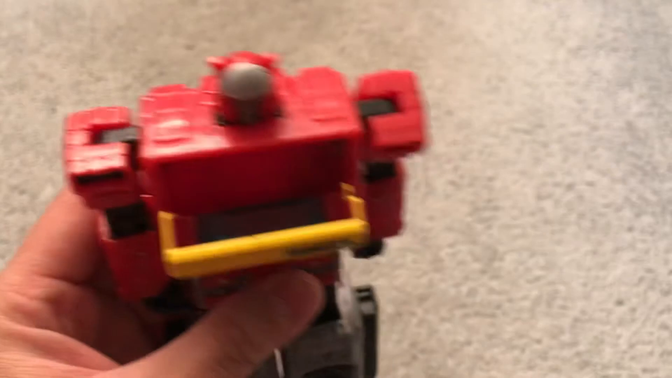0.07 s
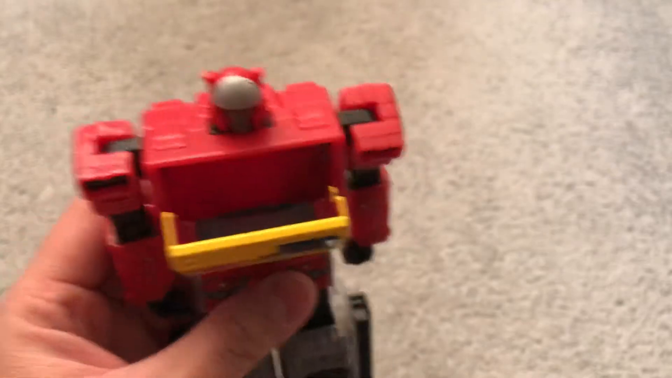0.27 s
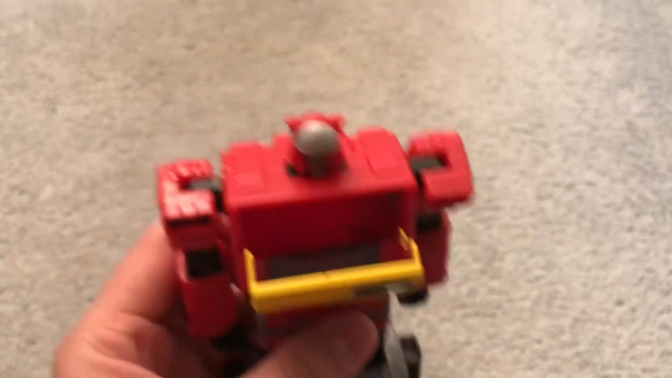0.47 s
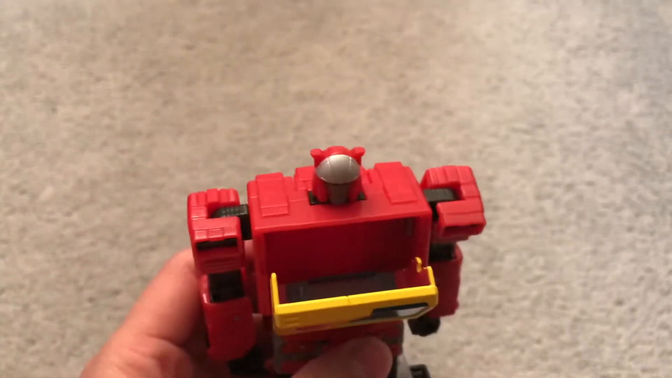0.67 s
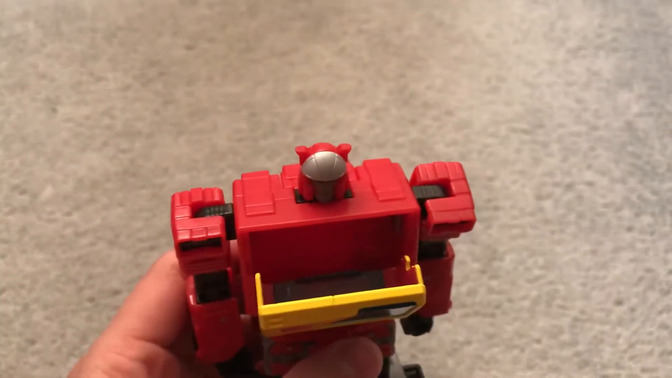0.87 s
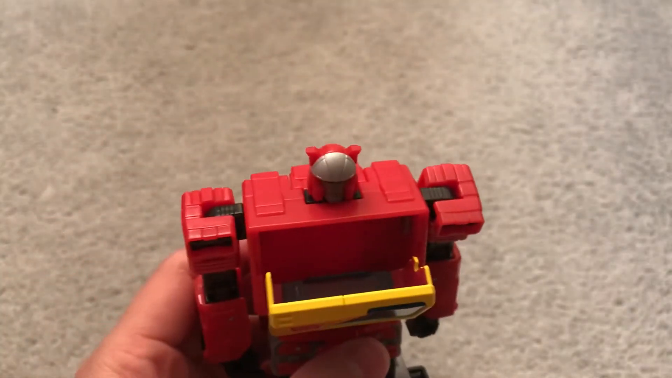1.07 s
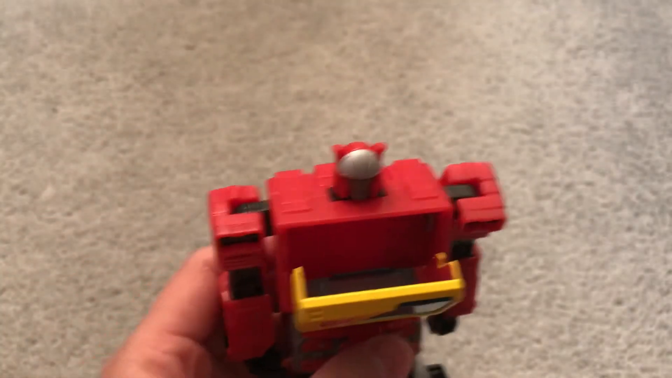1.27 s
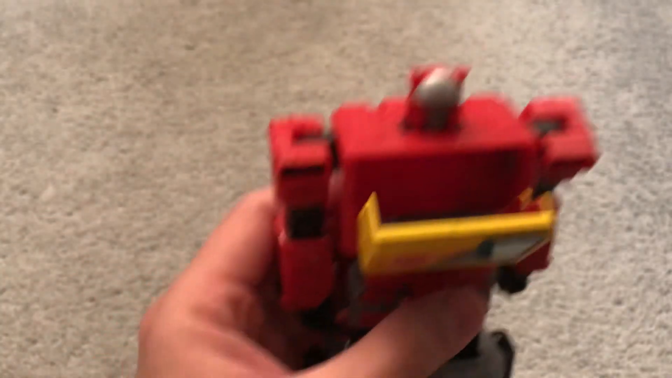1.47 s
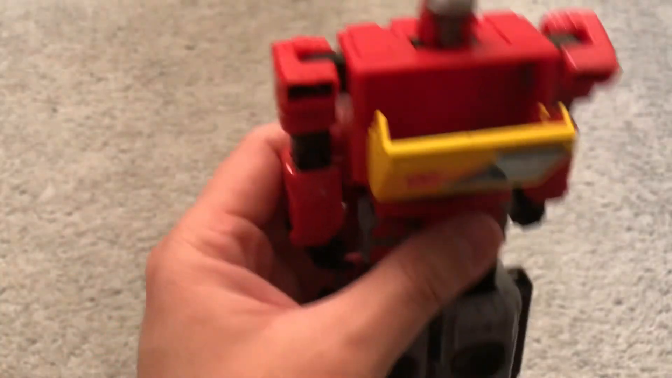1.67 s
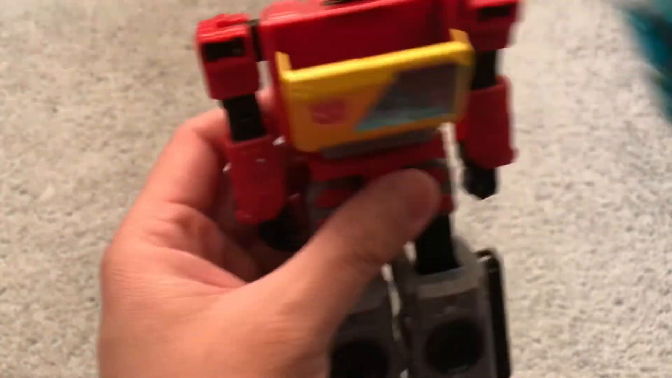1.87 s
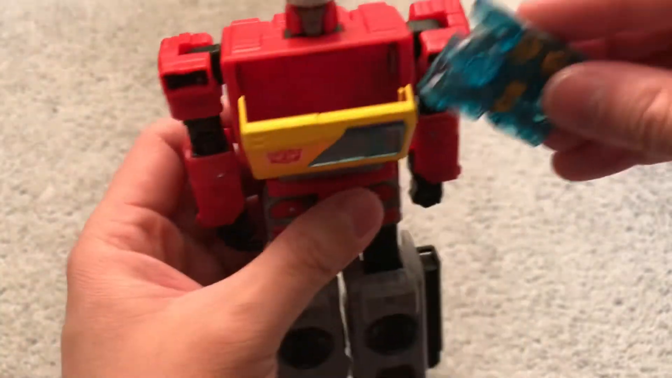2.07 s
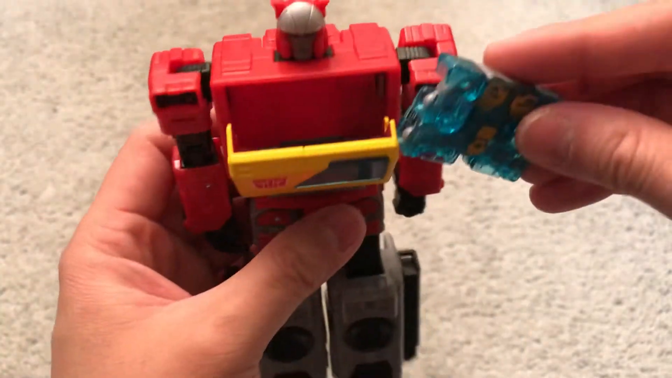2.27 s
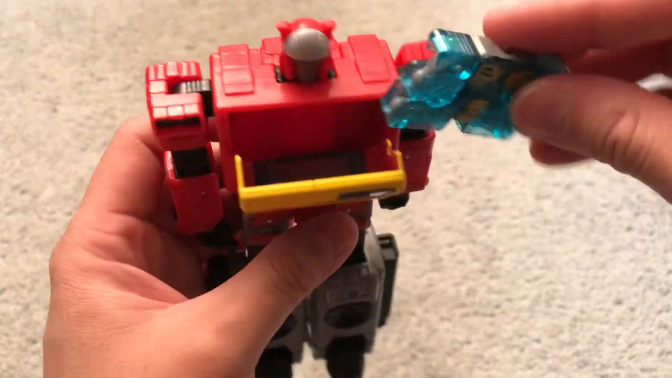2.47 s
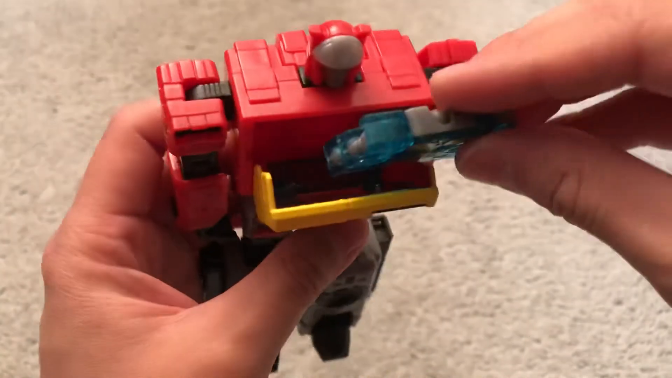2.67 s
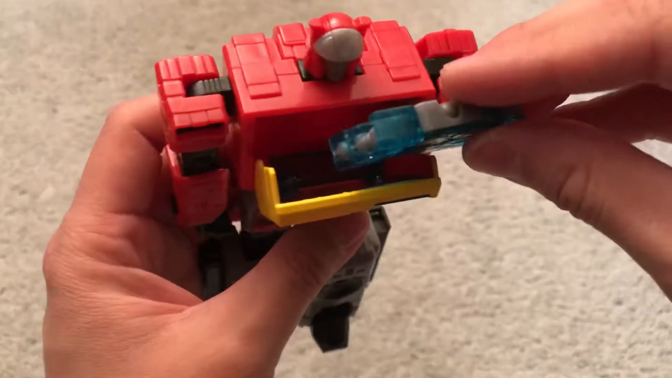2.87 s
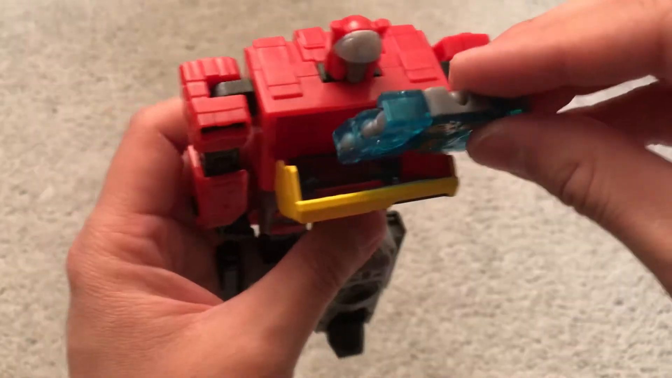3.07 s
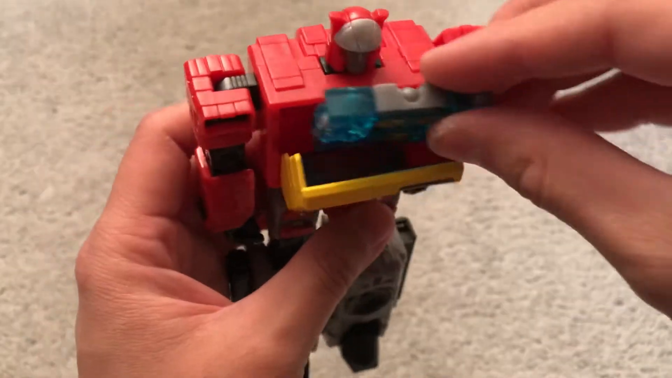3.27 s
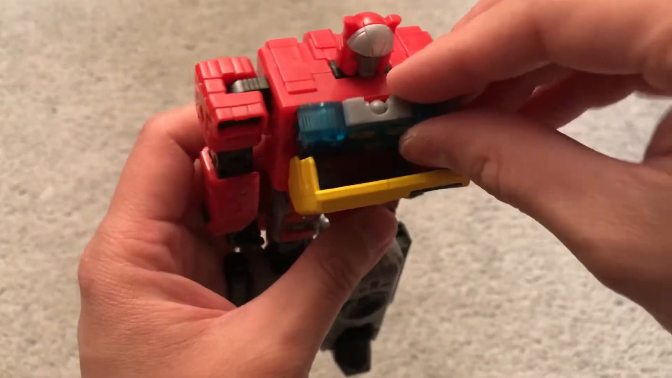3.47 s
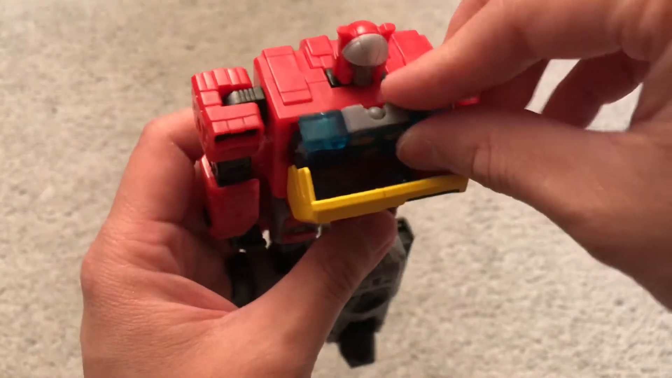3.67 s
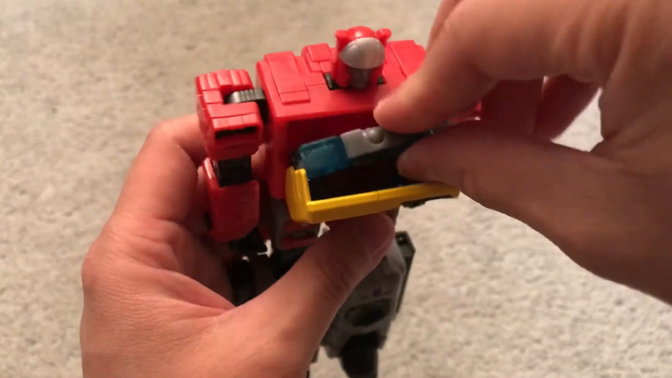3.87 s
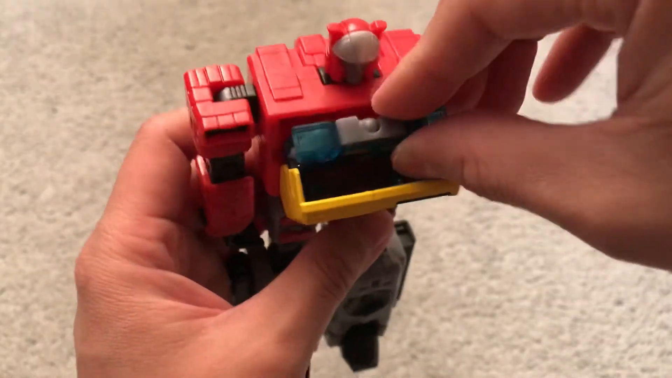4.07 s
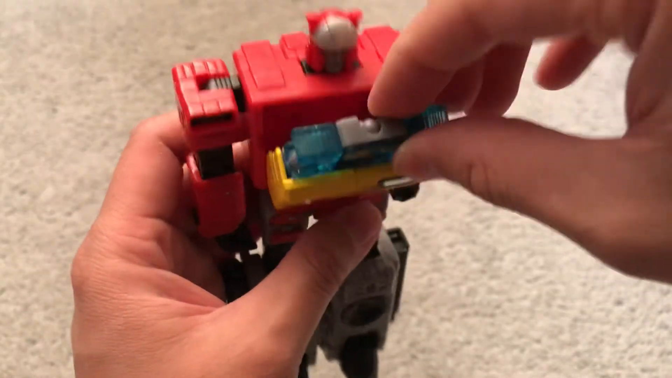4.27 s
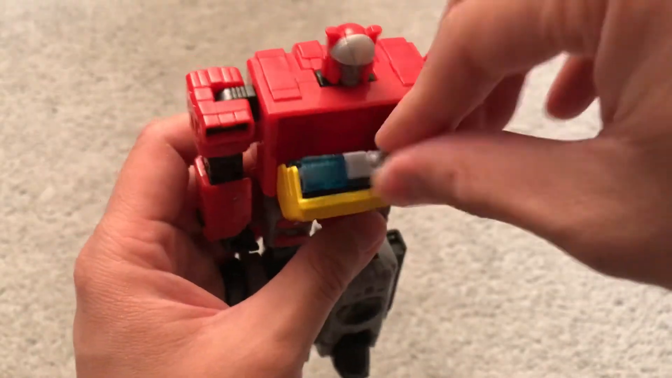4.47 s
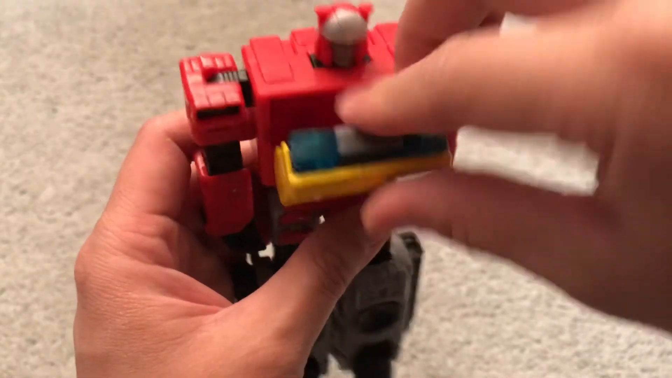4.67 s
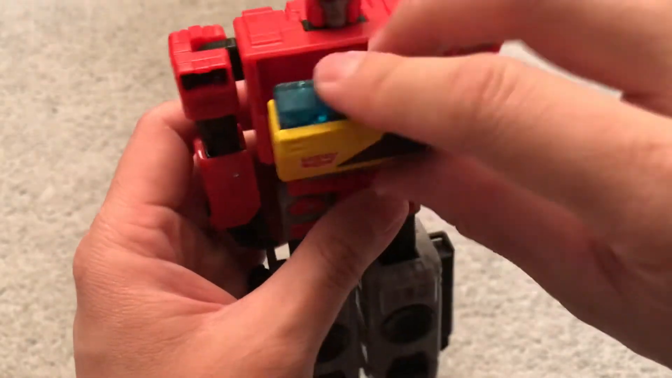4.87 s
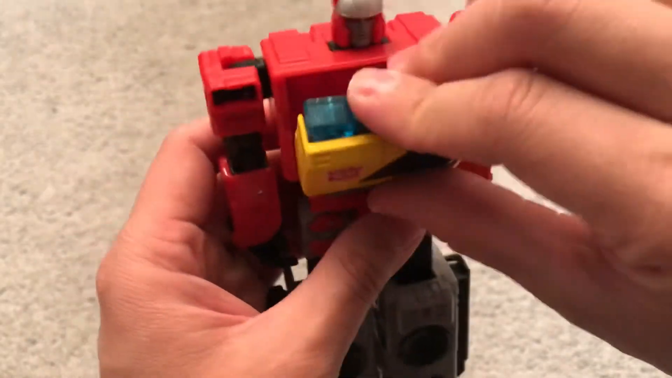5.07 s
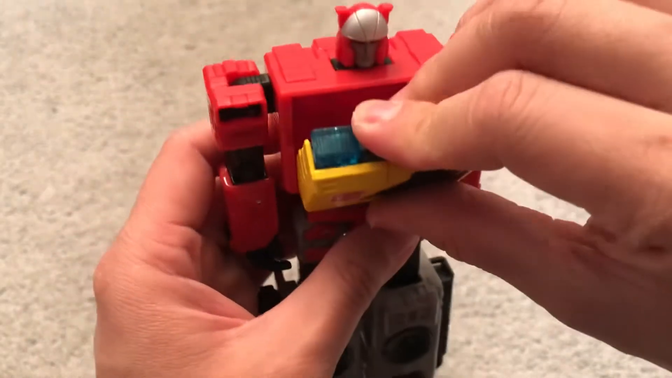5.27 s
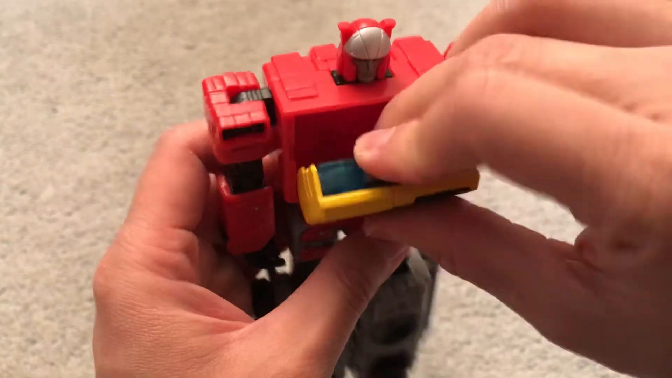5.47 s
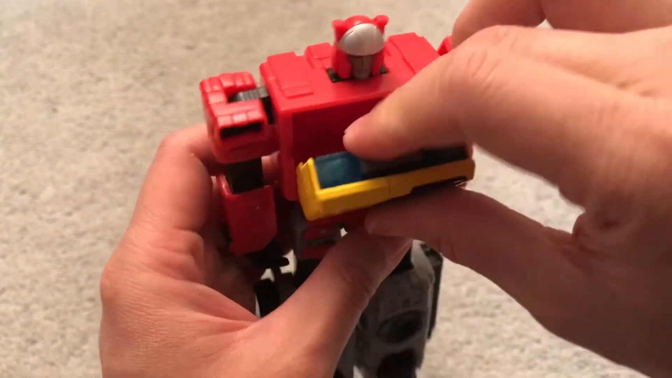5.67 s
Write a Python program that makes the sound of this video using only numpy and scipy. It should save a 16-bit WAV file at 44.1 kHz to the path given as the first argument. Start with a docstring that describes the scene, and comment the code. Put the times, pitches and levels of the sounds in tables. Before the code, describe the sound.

A hollow plastic toy is handled close to the microphone in a quiet carpeted room, over faint steady mains hum, low rumble and soft hiss. After half a second of quiet, light ticks gather from about 0.6 to 0.9 s, with one sharp bright click at 0.8 and a dull, lumpy palm rub lasting to 1.1. A lone click comes at 1.3, then near silence. Small ticks at 2.2 to 2.4 lead to a firm snap at 2.6. From 3.0 the clicks thicken: hard clacks around 3.05 and 3.35 to 3.6, lighter ticks and short scrapes to 4.0, then a busy rattle at 4.1 to 4.3. A strong double snap strikes at 4.45. Faint slides and sparse taps follow, with a clearer click at 5.33. By far the loudest latch snaps at 5.43, with a quickly fading plastic scrape and short, dry room tail.

```python
"""Folding a plastic toy

Hands fold a hollow plastic toy close to a microphone in a quiet carpeted room and push a part into its tray.
Hard parts click, snap and slide: short bursts of noise force make the toy's shell ring at many pitches.
A palm rubs the body early on, as dull, lumpy noise. Sparse echoes give the toy a short room tail.
Under it all are a mains hum (a wavering sine), a low rumble of the building and microphone hiss (shaped noise)."""
import sys
import numpy as np
from scipy import signal
from scipy.fft import rfft, irfft, next_fast_len
from scipy.io import wavfile
from scipy.ndimage import uniform_filter1d

SR = 44100
rng = np.random.default_rng(int(sys.argv[2]) if len(sys.argv) > 2 else 0)


def voltage_ratio(level):
    """Linear amplitude factor for a level in decibels (scalar or array-like)."""
    return 10 ** (np.asarray(level, float) / 20)


def wav_record(signal):
    """Record a signal, one row per channel, as 16-bit PCM in the file named by sys.argv[1]."""
    frames = np.transpose(np.atleast_2d(signal))
    bounded = np.clip(frames, -1, 1)
    # unit amplitude maps onto the largest positive 16-bit level
    quanta = np.round(bounded * 32767).astype(np.int16)
    wavfile.write(sys.argv[1], SR, quanta)


N = 252252  # length in samples


def read(points, hz):
    """Reads a table of (Hz, value) points between its rows, on a log-frequency axis."""
    f, value = np.transpose(points)
    return np.interp(np.log(hz + 1), np.log(f + 1), value)


def evened(x):
    """Scales a signal to an rms of 1."""
    return x / np.sqrt(np.mean(x ** 2) + 1e-20)


def add(mix, s, sound):
    """Mixes a sound in at second s."""
    part = mix[round(s * SR):][:len(sound)]
    part += sound[:len(part)]


def coloured(points):
    """Steady noise: white noise whose frequencies are weighted by a table of (Hz, dB)."""
    hz = np.fft.rfftfreq(N, 1 / SR)
    spectrum = rfft(rng.standard_normal(N)) * voltage_ratio(read(points, hz))
    return evened(irfft(spectrum, N))


# Spectrum of the rumble and hiss together.
# Each row: frequency in Hz, relative level in dB per Hz.
RUMBLE_AND_HISS = [(20, -23), (34, -14), (46, 4.5), (62, -3), (85, -13.5), (140, -12.5), (175, -20),
                   (320, -22.5), (900, -31.5), (2500, -35.5), (4700, -39), (9300, -42.5), (10500, -45),
                   (11600, -38.5), (13000, -37.5), (15600, -45), (16100, -72)]


def background():
    """Noise for the rumble and hiss, with a steady mains hum whose level wavers slightly."""
    hum_hz, hum_db, floor_db = 119.8, -64, -59.5  # levels are rms
    t = np.arange(N) / SR
    slow = uniform_filter1d(rng.standard_normal(N), size=6000)
    waver = evened(uniform_filter1d(slow, size=6000))
    hum = np.sqrt(2) * voltage_ratio(hum_db + 0.65 * waver) * np.sin(2 * np.pi * hum_hz * t)
    return hum + voltage_ratio(floor_db) * coloured(RUMBLE_AND_HISS)


# The ways the plastic shell can ring, called its modes, before each contact shifts them a little.
# Each row: pitch in Hz, width of the resonance in Hz (wider dies sooner), relative level in dB.
SHELL_MODES = [(140, 92, -9), (356.4, 430, -11), (526, 830, -9.5), (796, 1300, -6.5), (1134, 350, 1),
               (1674, 300, -12), (2150, 890, -6), (2500, 266, 2.5), (3000, 540, 0.5), (3600, 1070, -5.5),
               (4163, 1160, -4), (4740, 890, -12), (5720, 610, -3.5), (6740, 960, -6.5), (8260, 1120, -4.5),
               (9060, 1400, -6), (12200, 350, -3.5), (14140, 1500, -12.5), (14800, 760, -6)]


def shell(force, ring_hz, treble_db, thud_db, chance, ring_db=5.0):
    """The force drives every mode; where the part is touched decides which one rings most."""
    size = next_fast_len(len(force) + 1500)
    hz = np.fft.rfftfreq(size, 1 / SR)[:, None]
    f, width, db = np.transpose(SHELL_MODES + [(ring_hz, 340, ring_db)])
    db = db + treble_db * (f > 5200) * (f != ring_hz) + thud_db * (f < 1500)
    # Modes near the touched one share its motion
    db = db - 3.3 * abs(np.log2(f / ring_hz)) * (f > 1500)
    # Chance varies every level, and every pitch but the touched one
    level_chance, pitch_chance = chance[:len(f)], chance[len(f):2 * len(f)]
    db = db + 1.5 * level_chance
    f = f * (1 + 0.015 * pitch_chance * (f != ring_hz))
    # Neighbours in opposite phase leave no deep gaps between them
    sign = (-1.) ** np.argsort(np.argsort(f))
    modes = sign * voltage_ratio(db) * width * hz * 1j / (f ** 2 - hz ** 2 + 1j * width * hz)
    # Small panels radiate no bass
    no_bass = (1j * hz / (1j * hz + 1800)) ** 2
    response = np.where(f > 1500, modes * no_bass, modes).sum(1)
    return irfft(rfft(force, size) * response, size)[:size - 400]


# Every contact between hard parts of the toy.
# Each row: time in seconds, peak level in dB (a sine as strong as its loudest millisecond),
# pitch that rings most in Hz, hardness as treble in dB, thud (change below 1500 Hz) in dB.
CONTACTS = [(0.531, -59.5, 7600, 19, -30), (0.6457, -49, 5770, -10, -13), (0.6713, -46, 6500, -5, -1),
            (0.6824, -37.5, 5770, -6, -28), (0.709, -45.5, 2750, -0.5, -24), (0.7454, -56, 3280, 1, -18),
            (0.767, -53, 2840, -2, -28), (0.7955, -41, 7060, -7, -5), (0.8052, -25, 3600, 11, -10),
            (0.8389, -40.5, 4100, 4, -3), (0.862, -52, 6250, -10, -26), (1.002, -46, 3600, -2, -9),
            (1.027, -56.5, 3200, -10, -28), (1.2898, -39, 2990, -2, -2), (1.723, -54.5, 3900, 1.5, -32),
            (2.191, -37.5, 2380, -8.5, -35), (2.3333, -43.5, 2980, -3, -24), (2.3404, -46, 2160, -1, -32),
            (2.3487, -33.5, 2680, -7.5, -33), (2.365, -36.5, 2150, -6, -24), (2.432, -53, 8850, 16, -24),
            (2.6014, -22, 2970, -9.5, -15.5), (2.6181, -32, 5430, -24, -11.5), (2.636, -42, 2410, -25, -7),
            (2.6465, -42, 2520, -26, -17), (2.7607, -49.5, 3000, -25, -18), (2.778, -54, 2970, -22, -22),
            (2.8166, -53, 3160, -20, -37), (2.9791, -46.5, 1890, -5, -24), (3.0449, -25.5, 2670, -40, -18),
            (3.0584, -40, 2500, -26, -17), (3.0736, -29, 5610, 2, -15), (3.0815, -32, 2500, -13, -15.5),
            (3.2686, -49, 2200, -5, -8), (3.338, -27.5, 7060, 1, -5.5), (3.3693, -22.5, 2700, -12, -35),
            (3.3862, -36.5, 3070, -13, -16), (3.408, -28, 5900, -5.5, -17), (3.4517, -23, 5745, -17, -36),
            (3.457, -31, 2040, -20, -23), (3.4876, -35.5, 2500, -12, -24), (3.5436, -36.5, 4870, -7, -25),
            (3.5501, -28, 4640, -2, -30), (3.5951, -33, 4700, -5.5, -24), (3.6077, -49, 4100, -5, -21),
            (3.7648, -51, 2120, -18, -29), (3.7762, -39.5, 2980, -3.5, -15), (3.8046, -34, 3770, 3.5, -29),
            (3.8156, -51, 2700, -9, -10), (3.8309, -46, 4370, -3, -16), (3.8766, -51.5, 2620, -25, -29),
            (3.9077, -52, 3060, -19, -26), (3.9464, -46, 4480, -19, -31), (3.9726, -52, 2100, -14, -26),
            (4.0289, -41.5, 2640, -10, -14), (4.084, -38.5, 4430, -17, -29), (4.0962, -27, 2920, -8.5, -38),
            (4.139, -36.5, 2800, -11, -34), (4.1645, -45, 3050, -8.5, -31), (4.1761, -29, 2480, -8.5, -33),
            (4.2009, -24, 2600, -6, -29), (4.2191, -29.5, 2730, -7.5, -19), (4.229, -44, 3000, -12, -17),
            (4.2663, -25, 2820, 1.5, -43), (4.2895, -41.5, 2690, -5.5, -28), (4.422, -43.5, 5730, -12, -26),
            (4.4462, -23.5, 2920, -14.5, -11), (4.4502, -13.5, 4300, 0.5, -14.5), (4.5123, -45, 4200, 3, 0),
            (4.5226, -44.5, 3970, -1, 1), (4.608, -53, 2910, 3, -2), (4.6986, -39, 4070, -18, -36),
            (4.7666, -51, 5650, 1.5, -24), (5.0797, -56, 3200, -17, -29), (5.1798, -58, 4000, -11.5, -26),
            (5.2064, -42.5, 6030, -5.5, -33), (5.2567, -39, 4260, -13, -7.5), (5.267, -45, 4330, -8.5, -32),
            (5.3243, -53, 4260, -4.5, -24), (5.3328, -30, 4530, -4, -21), (5.359, -47, 2450, -14, -17),
            (5.3783, -36, 2500, -12, -26), (5.408, -41.5, 4020, 4, -10), (5.4253, -42, 3400, 0.5, -13),
            (5.4298, -5.5, 4190, 0, -17)]


def clicks():
    """A sharp blow, chatter while the parts touch, then a weak, duller rattle dying away."""
    tap_s, latch_s = 0.002, 0.008  # time in touch of a light tap and of a forced latch
    loose_hz = 2750  # the loose tray that rattles after every contact
    out, t = np.zeros(N), np.arange(3000) / SR
    chances = rng.standard_normal((len(CONTACTS), 40))
    grits = rng.standard_normal((len(CONTACTS), len(t), 2))
    for (s, db, hz, treble_db, thud_db), chance, grit in zip(CONTACTS, chances, grits):
        # Light taps (near 1) bounce off at once; a forced latch (near 0) grinds on to its end
        light = 1 / (1 + voltage_ratio(db + 15.0) ** 2)
        part = t / (latch_s + (tap_s - latch_s) * np.sqrt(light))
        rise = np.minimum(t / 0.00031, 1)
        release = 1 + (part / (0.74 + 0.87 * light)) ** 5
        chatter = rise * voltage_ratio(-9.0 * light * part) / release * grit[:, 0]
        blow = voltage_ratio(14.5) * light * (t == 0)  # taps begin with one clean impact
        # A latch shakes the whole shell more evenly, so its main pitch stands out less
        ring_db = 6.0 - 1.5 * (1 - light)
        contact = shell(blow + chatter, hz, treble_db, thud_db, chance, ring_db)
        fading = voltage_ratio(-13 - 60 * t / 0.071) * np.minimum(t / 0.0029, 1)
        rattle_force = fading * uniform_filter1d(grit[:, 1], size=2)
        rattle_treble_db, rattle_thud_db = min(treble_db, 0) + 1.5, max(thud_db + 4.5, -16)
        rattle = shell(rattle_force, loose_hz, rattle_treble_db, rattle_thud_db, chance, 2.8)
        sound = contact + rattle
        loudest = np.sqrt(2 * uniform_filter1d(sound ** 2, size=44).max())
        add(out, s - 0.0002, voltage_ratio(db) * sound / loudest)
    return out


def grip():
    """Palm shifting on the toy: skin drags on the hollow body, a dull, low, lumpy rub."""
    start_s, end_s, fade_s = 0.616, 1.125, 0.096
    level_db, lumps_db = -67, 1.5
    t = np.arange(N) / SR
    held = np.clip(np.minimum(t - start_s, end_s - t) / fade_s, 0, 1)
    lumps = evened(uniform_filter1d(rng.standard_normal(N), size=1500))
    # Pairs of frequency in Hz and relative level in dB
    rub = coloured([(150, -24.0), (330, 1.5), (440, -12), (650, -15.5), (1300, -14), (3000, -29.5)])
    return held * voltage_ratio(level_db + lumps_db * lumps) * rub


# Slides and rattles of plastic on plastic.
# Each row: start in seconds, end in seconds, rms level in dB, pitch that rings most in Hz,
# change of the force from start to end in dB.
STROKES = [(0.68, 0.727, -60, 5970, -31), (0.796, 0.925, -53.5, 3600, -37), (0.996, 1.057, -72, 3600, -18),
           (2.269, 2.33, -70, 3670, 3), (2.327, 2.374, -57.5, 2940, 20), (2.76, 2.853, -82, 2920, 7),
           (2.888, 2.94, -71, 2800, -13), (2.937, 2.992, -67.5, 2300, 22), (3.055, 3.067, -67, 2700, -3),
           (3.086, 3.166, -79, 2680, 3), (3.643, 3.742, -65.5, 2820, -7), (3.751, 3.824, -63, 2020, -2),
           (3.911, 3.928, -63.5, 2810, 2), (3.93, 3.993, -74, 2500, 6), (4.01, 4.085, -69, 2500, 5),
           (4.105, 4.152, -54.5, 2820, -3.5), (4.156, 4.189, -56.5, 2920, 5.5),
           (4.2, 4.237, -62.5, 2800, 1.5), (4.261, 4.3, -58.5, 2660, -6.5),
           (4.422, 4.462, -50.5, 3000, 6.5), (4.45, 4.555, -64.5, 2500, -8.5),
           (4.601, 4.683, -66.5, 3000, -9), (4.678, 4.711, -58, 4070, 1.5), (4.744, 4.793, -70, 4100, -4),
           (4.839, 4.87, -69, 3050, -9), (4.854, 4.875, -61, 5420, 3), (4.908, 5.049, -66.5, 4080, 9.5),
           (5.413, 5.435, -52.5, 2840, 14.5), (5.429, 5.557, -39.5, 4070, -45)]


def slides():
    """Dense tiny slips in uneven clumps under each stroke, with a few sharper catches."""
    catches_per_s, catch_db = 65, 15  # now and then an edge catches and ticks
    firm_db, dulling = -57.5, 0.45  # softer slides lose this much treble in dB per dB below firm_db
    bright_db = 1.5  # treble in dB gained per octave of ring above 3000 Hz
    out = np.zeros(N)
    chances, grit = rng.standard_normal((len(STROKES), 40)), rng.standard_normal((N, 3))
    clumps = evened(uniform_filter1d(grit[:, 2], size=200))
    slips = grit[:, 0] * voltage_ratio(3.0 * grit[:, 1] + 2.5 * clumps)
    caught = rng.random(N) < catches_per_s / SR
    slips = slips + voltage_ratio(catch_db) * grit[:, 0] * caught
    for (start, end, db, hz, change_db), chance in zip(STROKES, chances):
        force = slips[round(start * SR):round(end * SR)]
        swell = voltage_ratio(np.linspace(0, change_db, len(force)))
        stroke = signal.windows.tukey(len(force), 0.2) * swell
        treble_db = dulling * min(db - firm_db, 0) + bright_db * np.log2(hz / 3000)
        sound = shell(force * stroke, hz, treble_db, -13.0, chance, 4.7)
        add(out, start, voltage_ratio(db) * evened(sound))
    return out


# How long the room rings.
# Each row: frequency in Hz, time to die away by 60 dB in seconds.
ROOM_DECAY = [(300, 0.2), (1300, 0.4), (3500, 0.4), (9000, 0.33), (15000, .12)]


def room(x):
    """Sparse echoes of random sign, each band dying at its own speed."""
    taps = np.zeros(SR // 2)
    at = np.arange(300, len(taps) - 20, 20)
    taps[at + rng.integers(0, 20, len(at))] = rng.choice([-1., 1.], len(at))
    hz, t, bands = signal.stft(taps, SR, nperseg=256)
    bands *= voltage_ratio(-4.0 * hz / 10000)[:, None]  # the carpet swallows treble at the first bounce
    decay = voltage_ratio(-60 * t / read(ROOM_DECAY, hz)[:, None])
    tail = signal.istft(bands * decay, SR, nperseg=256)[1]
    return signal.fftconvolve(x, tail / np.linalg.norm(tail))[:N]


def scene():
    """The toy, its room tail, the hand and the background."""
    toy = clicks() + slides()
    return (toy + voltage_ratio(-25) * room(toy) + grip() + background())[None]


def roll_off(x):
    """The treble ends steeply here."""
    return signal.sosfilt(signal.butter(12, 16810, fs=SR, output="sos"), x)


def record(dry):
    """A low-pass filter takes away what lies above about 16200 Hz in the finished mix."""
    low_pass = signal.firwin(255, 16200, window=("kaiser", 5), fs=SR)
    mix = signal.oaconvolve(dry, low_pass[None], "same")
    return roll_off(mix)


dry = scene()
out = record(dry)
wav_record(out)
```